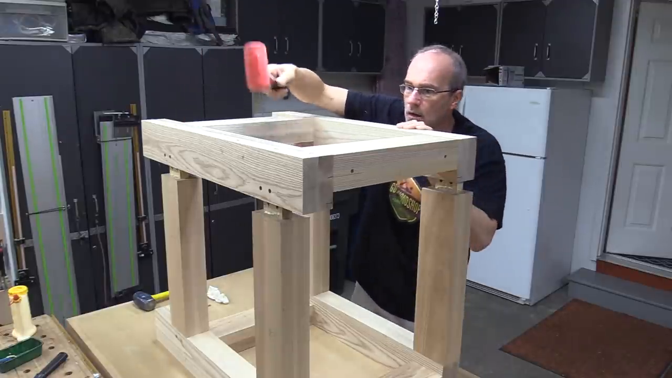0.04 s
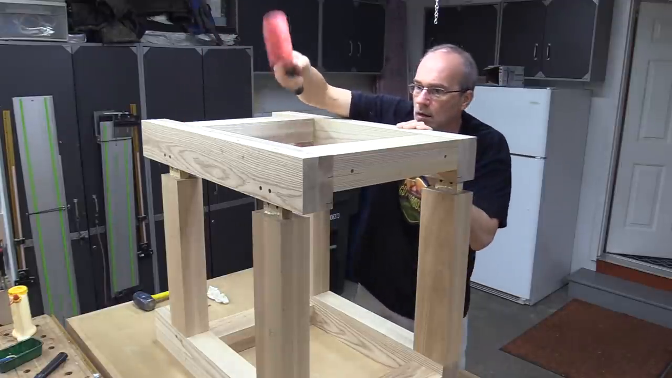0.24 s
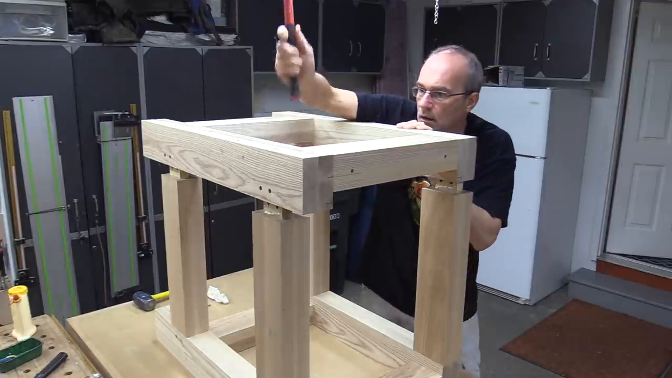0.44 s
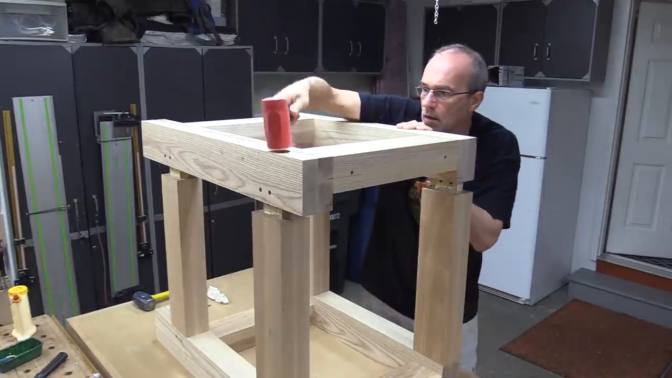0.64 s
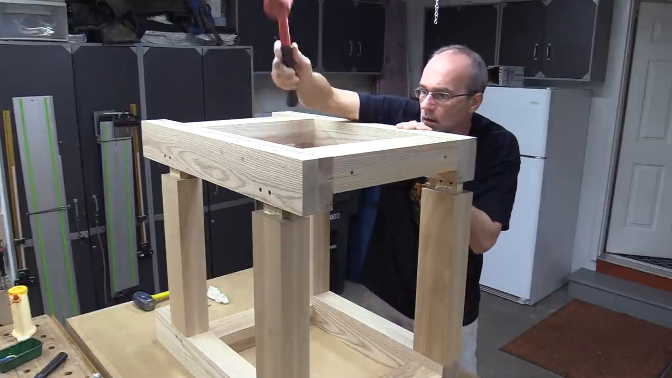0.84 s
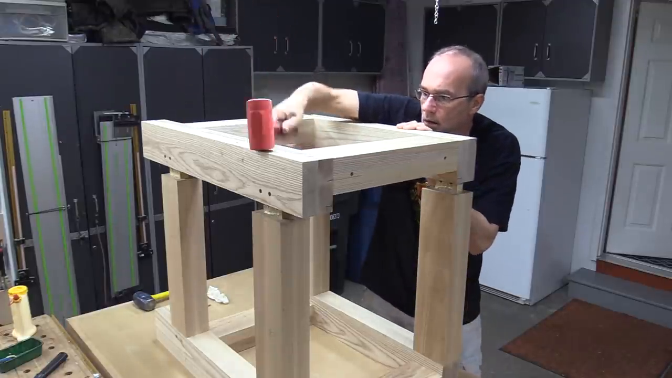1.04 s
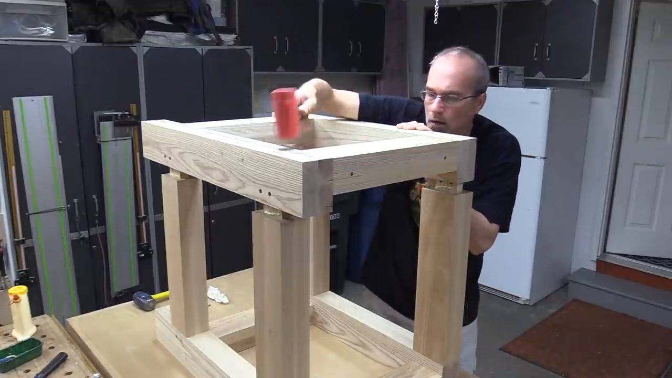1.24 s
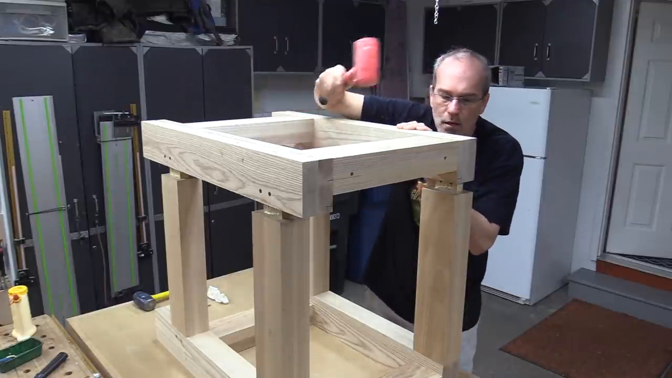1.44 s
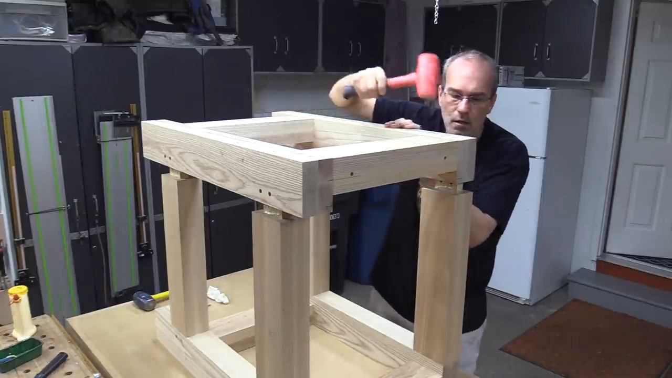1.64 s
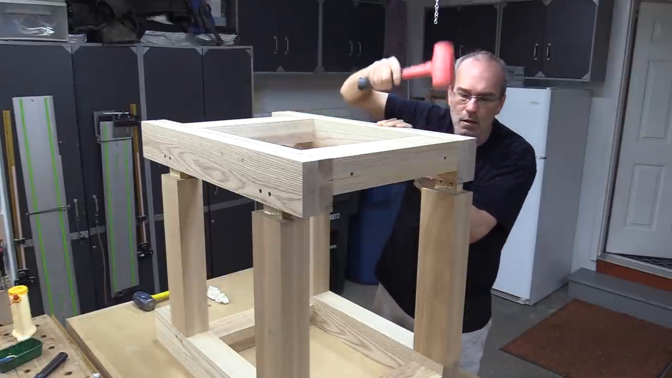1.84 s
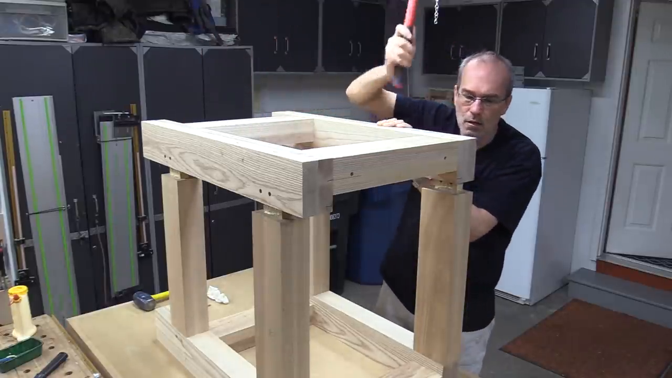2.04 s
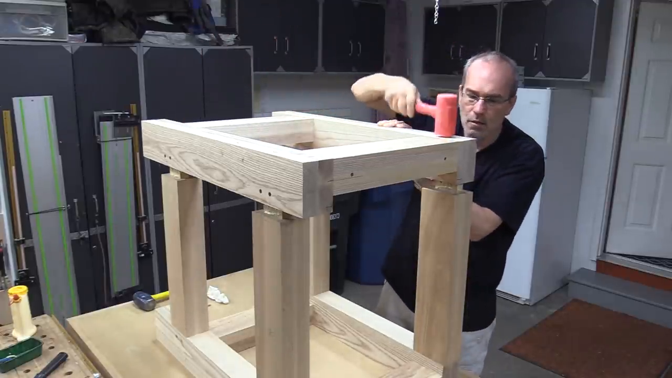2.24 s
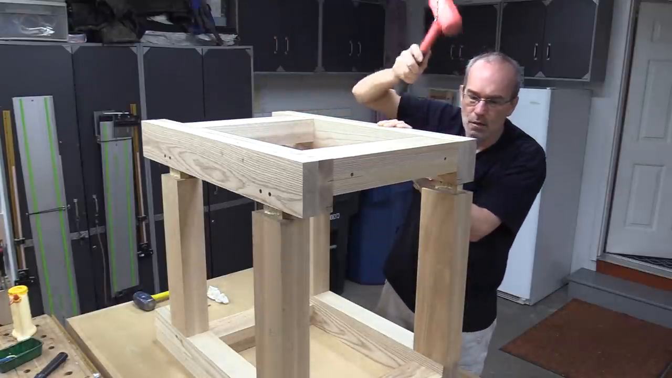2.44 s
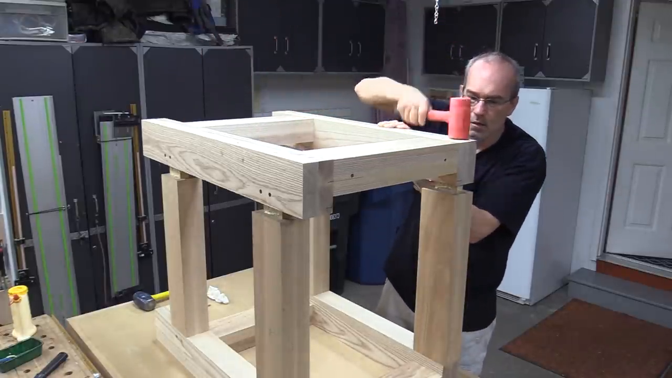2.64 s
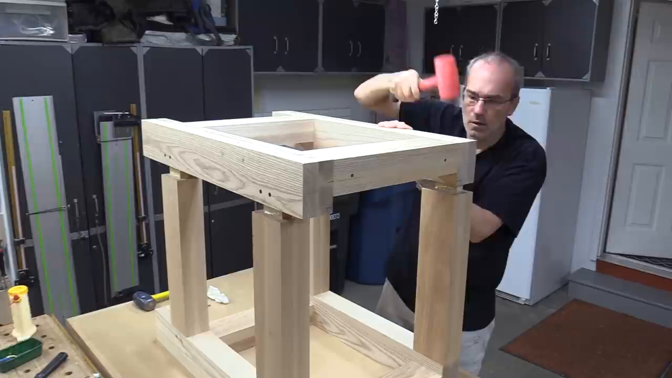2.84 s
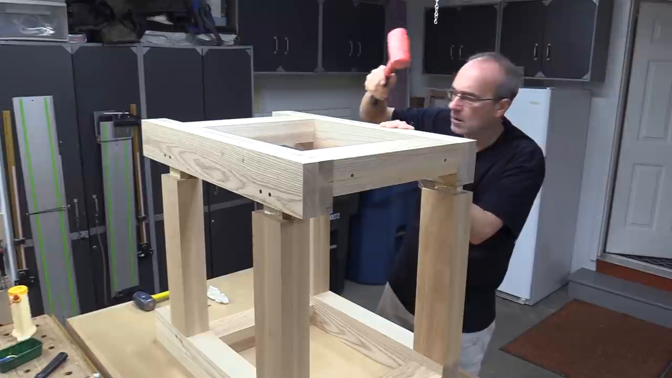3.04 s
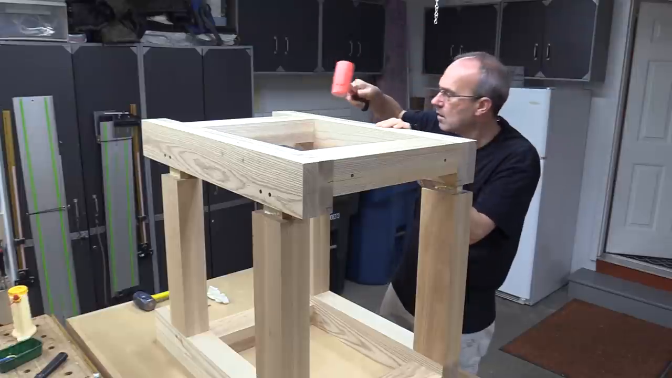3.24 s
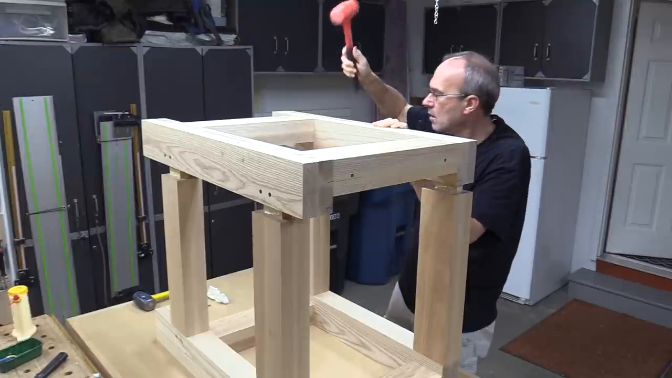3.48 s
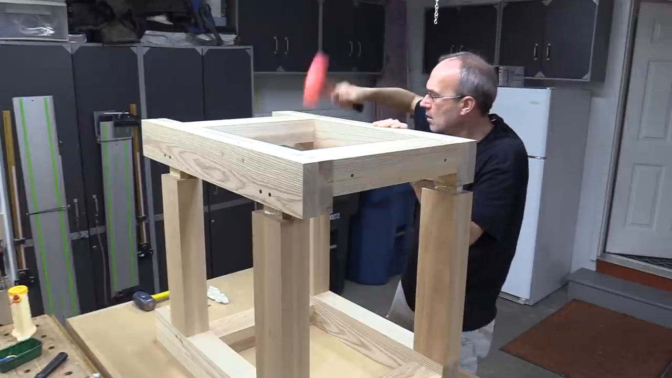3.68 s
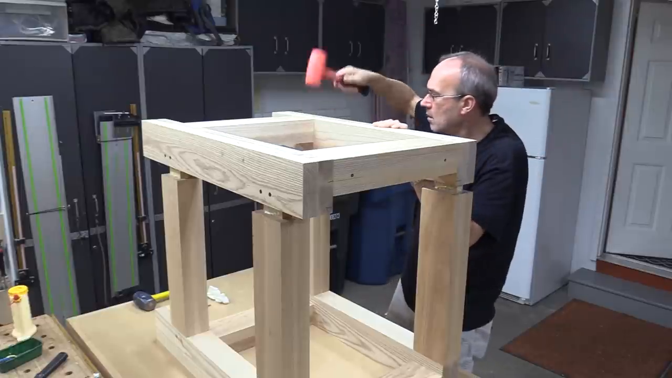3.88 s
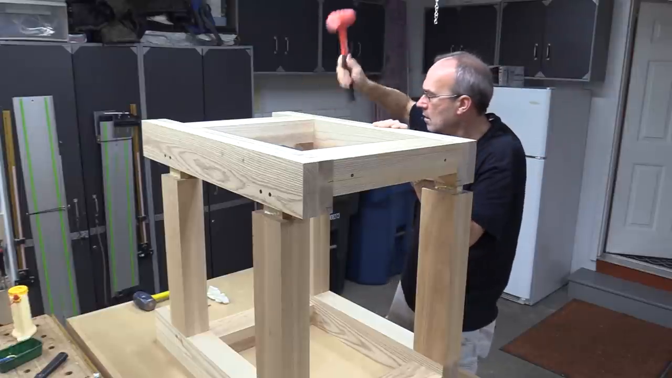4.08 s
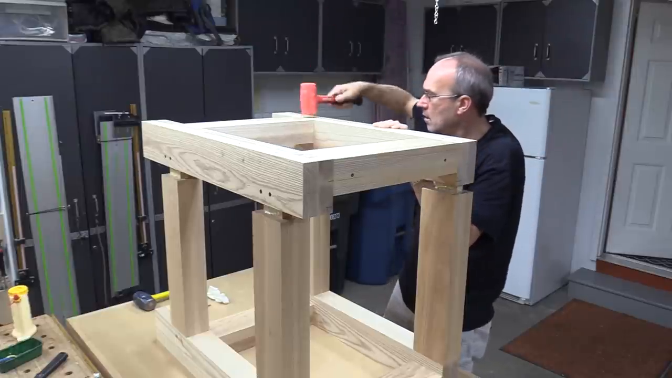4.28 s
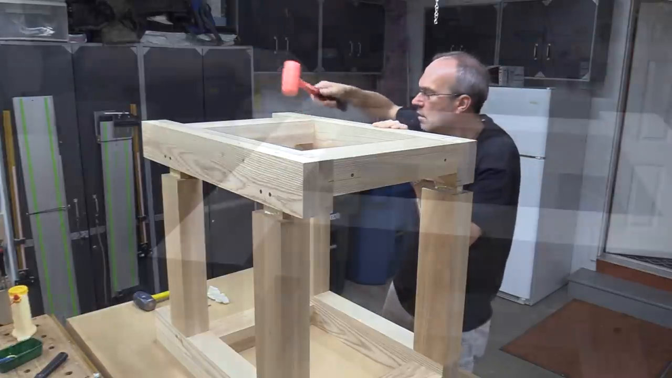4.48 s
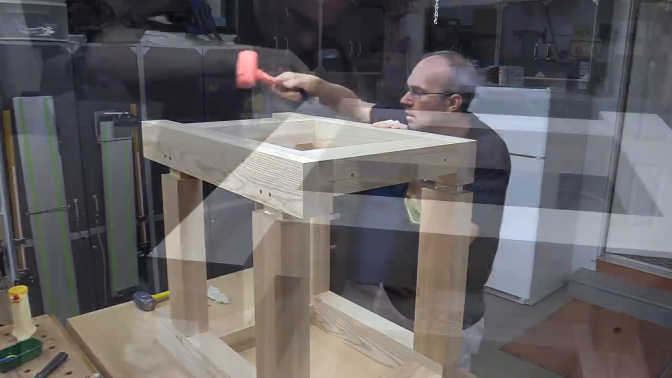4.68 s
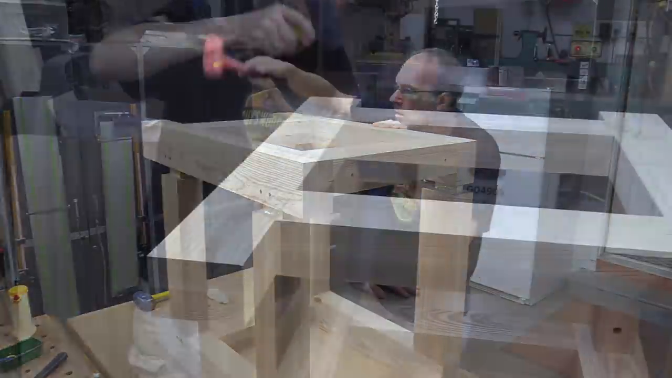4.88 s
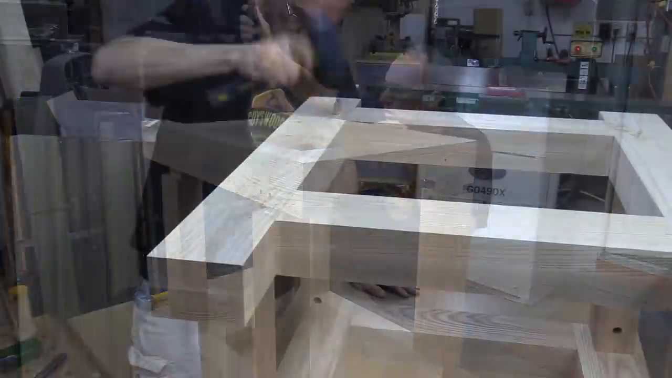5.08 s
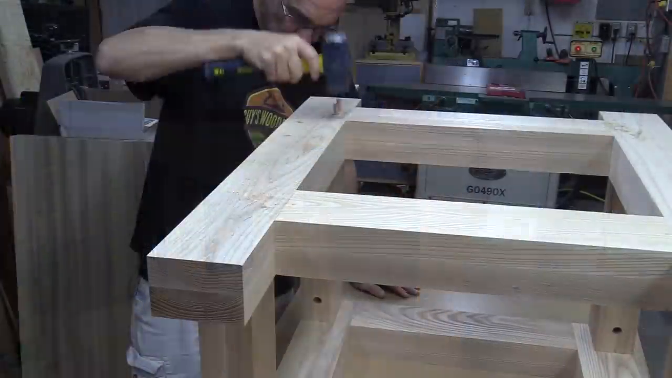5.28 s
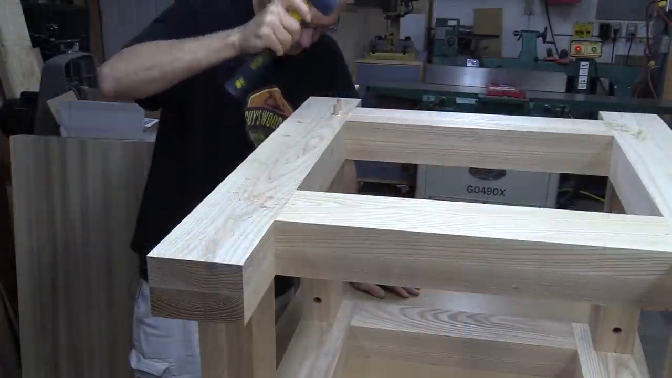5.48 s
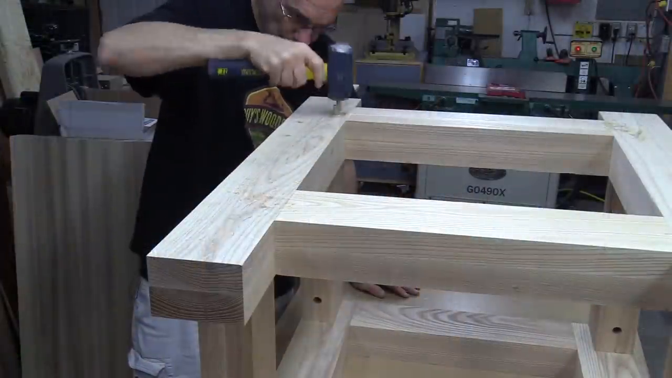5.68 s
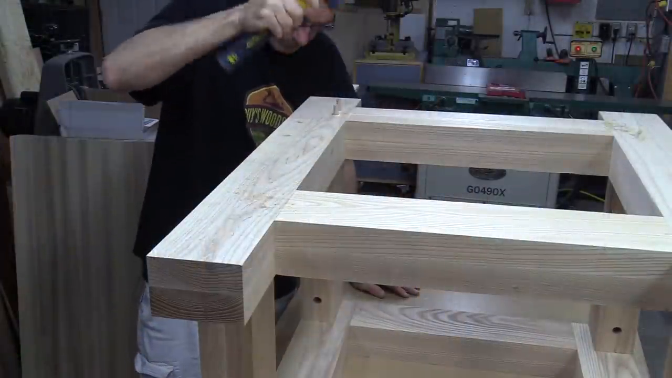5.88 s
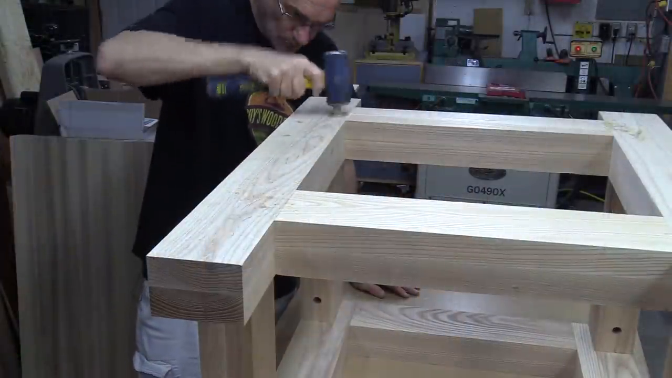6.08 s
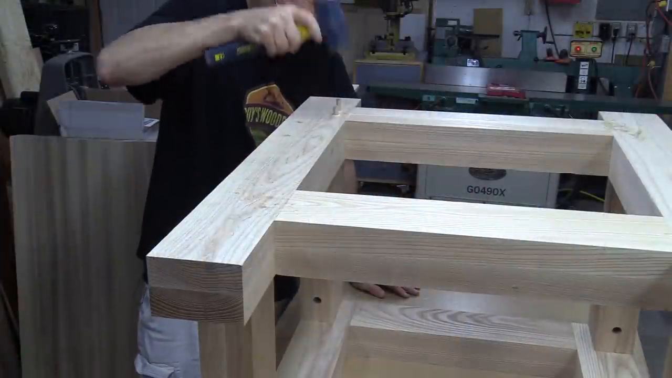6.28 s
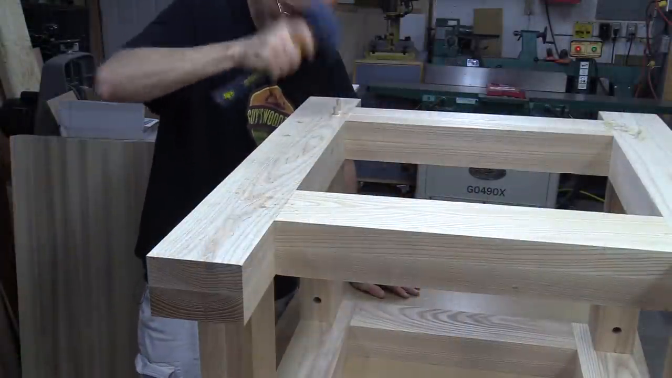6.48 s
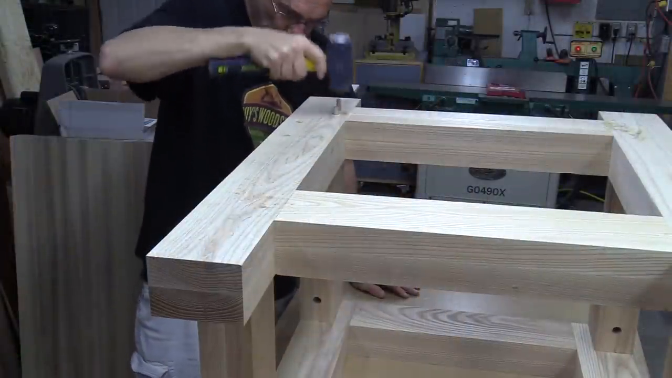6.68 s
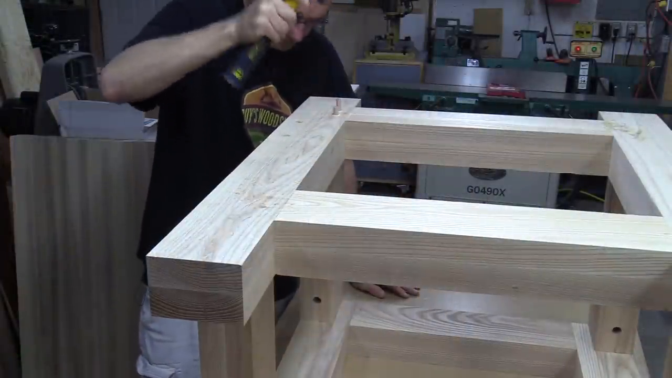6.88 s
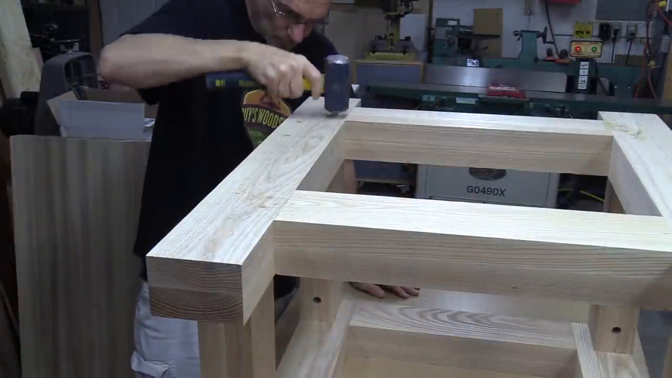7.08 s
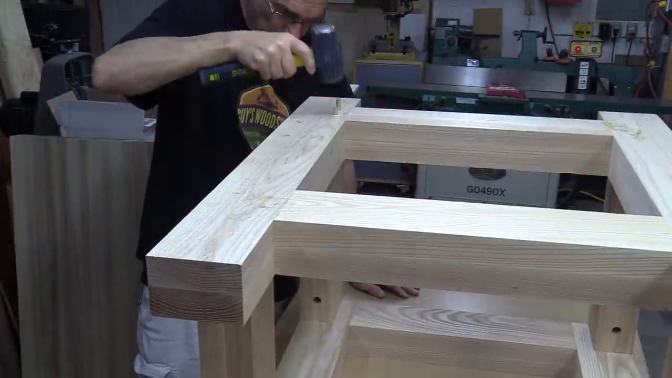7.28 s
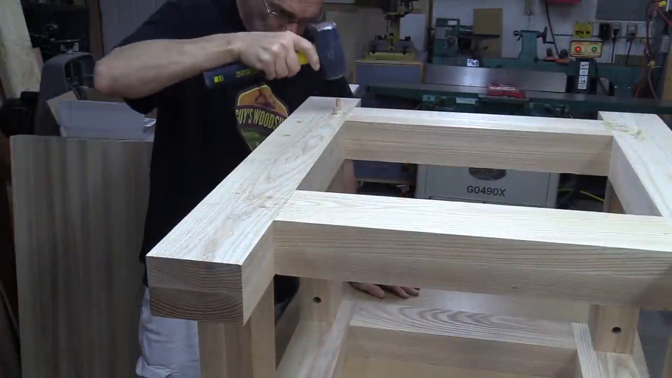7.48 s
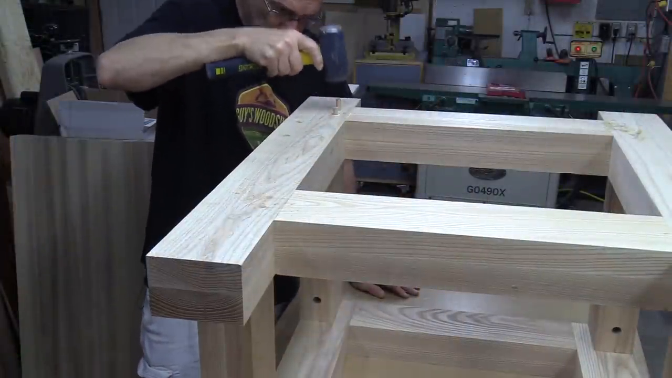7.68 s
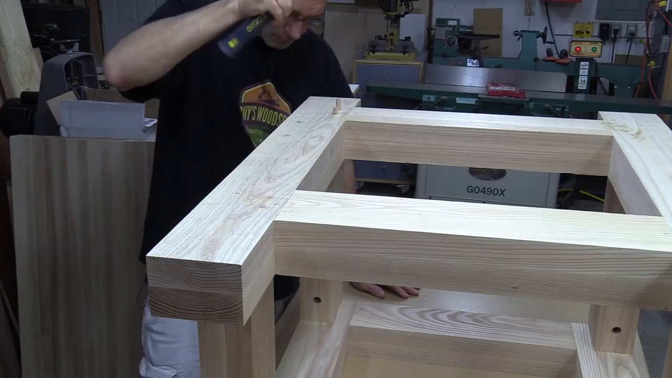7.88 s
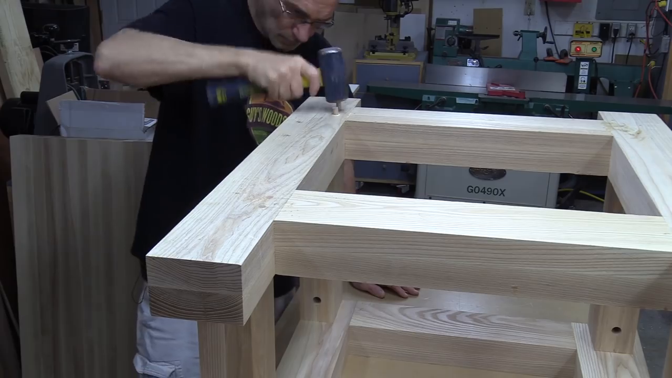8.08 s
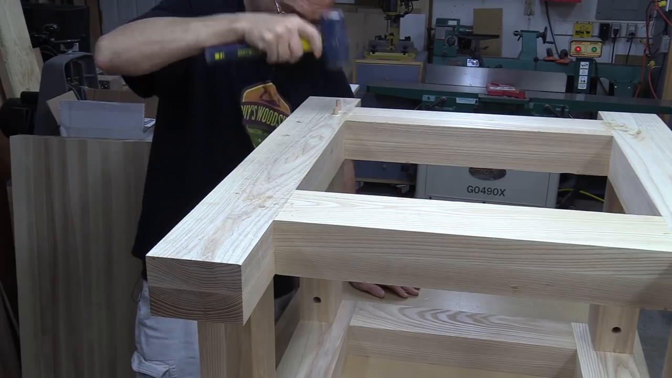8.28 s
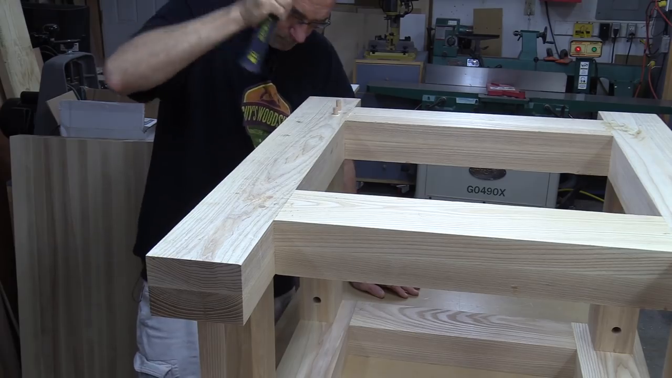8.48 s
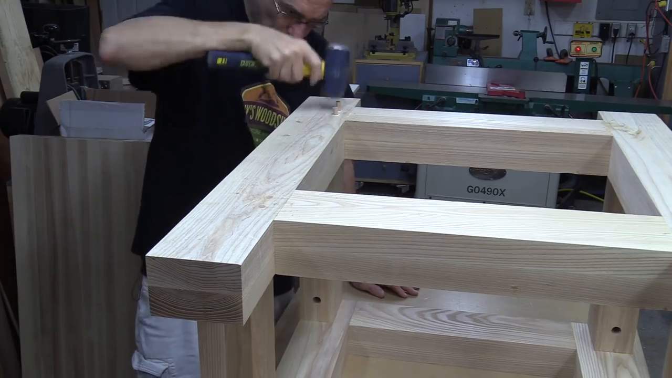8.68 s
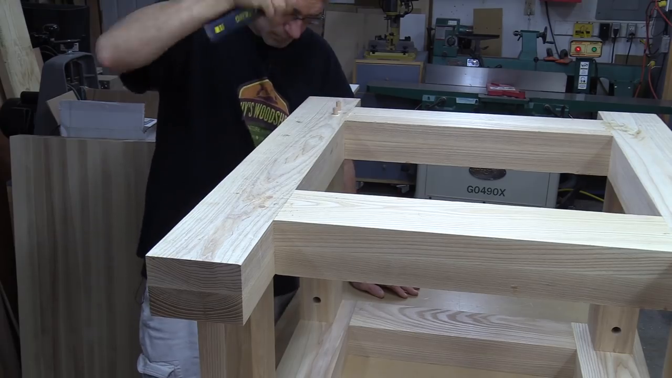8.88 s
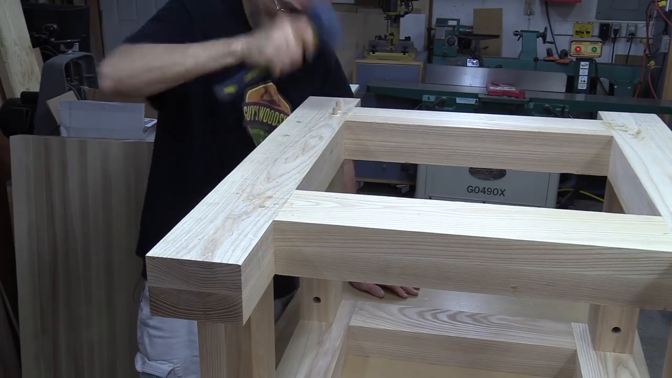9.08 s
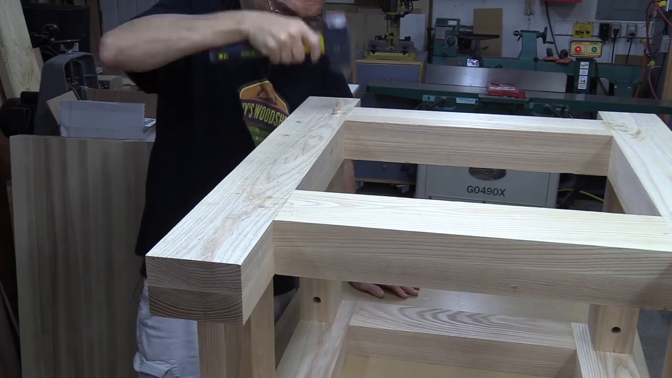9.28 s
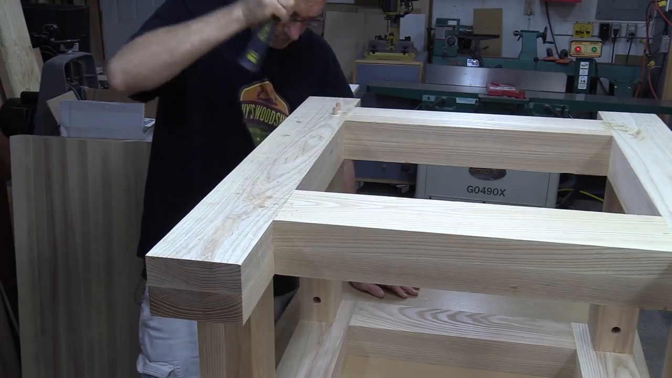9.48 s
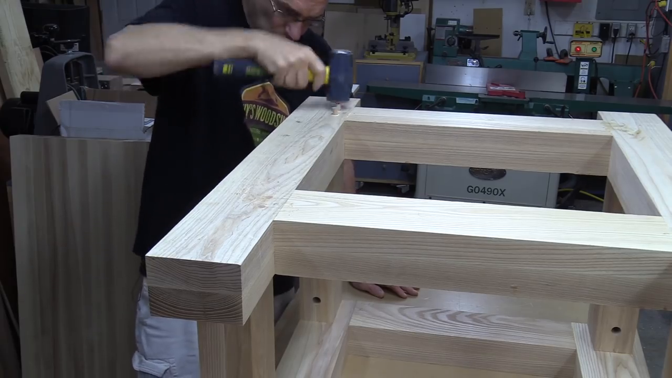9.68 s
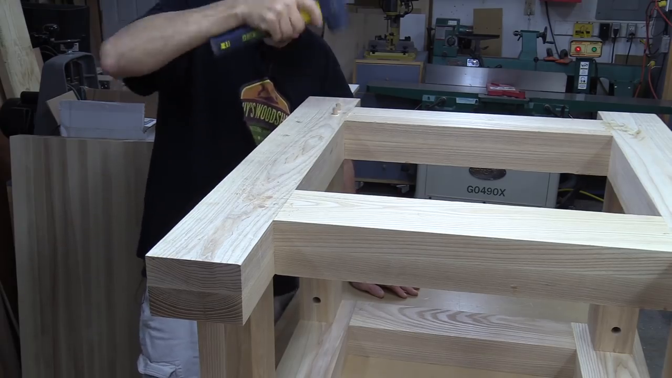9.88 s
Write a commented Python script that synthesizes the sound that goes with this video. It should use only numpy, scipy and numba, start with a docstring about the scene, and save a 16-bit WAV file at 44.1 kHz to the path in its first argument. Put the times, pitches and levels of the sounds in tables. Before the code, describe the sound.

The tail of a light mallet touch opens over quiet room air and low motor hum. A faint shot hiss at 0.5 s leads to a loud, sharp wooden crack at 0.66 and a duller knock at 1.1. A second pair, at a more resonant spot, lands at 2.3 and 2.7, the latter stronger, each preceded by a brief pellet swish. After a barely audible tap at 3.4, a harder-toned pair strikes at 3.8 and 4.25, again with small hisses. The background shifts to a closer position from 4.4 to 5.1. Fuller, thudding blows with bright clacks then hit a corner joint at 5.2, 5.7, 6.15, 6.6 and 7.1, growing more solid. After a pause, four more follow at 8.2, 8.7, 9.2 and 9.7, looser at first, the last firm and heavy. Hard-walled echoes hold briefly after each hit, then fade.

```python
"""Mallets on a pine frame in a workshop

A pine workbench frame is knocked together in a hard-walled shop: pairs of dead blows on the rail, with short
hisses of shot in the mallet, then, heard from closer by, a second mallet's blows on the corner. Each blow is a noise
crack, filtered wood and a push, with the room's echo; air noise and motor hum lie beneath. A limiter behind the
microphone ducks on loud blows and recovers, so that their echo stays level for a moment before it dies away.
"""
import sys
import numpy as np
from scipy import signal
from scipy.fft import rfft, irfft, next_fast_len
from scipy.io import wavfile
from scipy.ndimage import map_coordinates
from numba import njit

SR = 44100
rng = np.random.default_rng(int(sys.argv[2]) if len(sys.argv) > 2 else 0)


def output_pcm(signal):
    """Save a mono or channel-first signal as 16-bit PCM at the path in sys.argv[1].

    Samples are clipped to [-1, 1] before scaling.
    """
    pcm = np.clip(np.atleast_2d(signal).T, -1, 1) * 32767
    wavfile.write(sys.argv[1], SR, np.round(pcm).astype(np.int16))


N = 437913

# Mallet set down lightly on the rail; the first touch begins just before the start, so only its rest is heard.
# Each row: start in seconds, level in dB, resonance of the place in Hz.
LIGHT_TOUCHES = [(-.09, -19, 1400), (3.398, -52, 1140)]
# Shot sliding inside the dead-blow head as the swing turns over.
# Each row: centre in seconds, level in dB, standard deviation of the swell in seconds.
SHOT_SLIDES = [(.54, -50.5, 0.021), (2.131, -44, 0.021), (2.616, -42, 0.017), (3.657, -46, 0.018),
               (4.155, -42, 0.016)]
# Broad colour of a knock with the far and the near mallet. Each row: frequency in Hz, relative level in dB per Hz.
RAIL_COLOUR = [(30, -26.5), (80, -12), (150, -3.5), (240, -4), (400, -5.5), (600, -5), (900, -1),
               (1450, -7), (2000, -13.5), (3000, -19), (4000, -22), (6500, -20), (9000, -23.5),
               (12000, -34)]
CORNER_COLOUR = [(30, -12), (85, -11.5), (150, 0), (195, 4), (260, 6), (400, -1), (620, -3.5), (1100, -8.5),
                 (1750, -11), (2200, -18.5), (4200, -21), (5300, -27.5), (8000, -30), (12000, -37.5)]
# Modes of the frame, struck on its far rail and on its corner.
# Each row: frequency in Hz, full width at half height in Hz, height above the colour in dB.
RAIL_MODES = [(160, 30, 2), (470, 40, 4), (581, 16, 6), (615, 18, 4), (662, 22, 9), (765, 25, 4),
              (830, 25, 3), (990, 28, 8), (1115, 25, 4), (1225, 25, 3), (1350, 30, 6), (1560, 40, 3)]
CORNER_MODES = [(117, 12, 4), (164, 16, 7), (228, 14, 5), (339, 15, 10), (457, 15, 10.5), (665, 30, 5),
                (748, 16, 9), (915, 25, 4), (988, 14, 10), (1368, 36, 5), (1560, 40, 5), (1655, 35, 4),
                (2536, 22, 6), (3625, 32, 6), (4220, 50, 3), (5715, 60, 3)]
# Decay of the workshop. Each row: frequency in Hz, time to fall 60 dB in seconds.
ROOM_DECAY = [(60, 0.55), (170, 0.38), (350, 0.48), (700, 0.54), (1500, 0.56), (4000, 0.58), (8000, 0.48),
              (12000, 0.41)]
# Colour of the quiet shop. Each row: frequency in Hz, relative level in dB per Hz.
AIR_COLOUR = [(25, -9.5), (45, -0.5), (90, -5.5), (140, -1), (250, -7.5), (400, -4.5), (800, -17),
              (1200, -16.5), (2000, -25), (5000, -28.5), (11500, -32)]
# Places on the rail, each struck twice.
# Each row: resonance in Hz, weight (low end) in dB, hardness (high end) in dB.
RAIL_PLACES = [(484, -1, -9), (715, 2.5, -4), (566, 5.5, 1)]
# Dead-blow strokes, two to a place. Each row: start in seconds, force in dB, pitch of the contact in Hz, snap in dB.
RAIL_BLOWS = [(.6583, 3.5, 2440, 8.5), (1.1108, 1.5, 1000, -8), (2.2742, 1.5, 1400, -5.5),
              (2.7142, 4, 2050, -2.5), (3.7975, -1, 1400, -8), (4.26, 1, 1450, -7)]
# Strokes on the corner.
# Each row: start in seconds, force in dB, how far the joint is seated from 0 to 1, pitch of the clack in Hz.
CORNER_BLOWS = [(5.2097, -1.5, 0.04, 6300), (5.6742, 1, 0.54, 7950), (6.1396, 2.5, 0.76, 5440),
                (6.6215, 2, 0.77, 5200), (7.111, 4.5, 0.95, 5700), (8.1783, 0.5, 0, 4150),
                (8.7098, 0, 0.36, 4320), (9.2189, 1, 0.36, 4340), (9.7198, 4, 0.94, 4500)]
# Appliance motor, at the first and at the closer position. Each row: frequency in Hz, middle level in dB rms.
HUM_FAR = [(59.2, -53), (134.6, -65), (188.4, -66), (285.3, -63.5), (1130, -75)]
HUM_NEAR = [(59.2, -58.5), (231.5, -60.5), (904.4, -64)]
# Start and end, in seconds, of the background's fade from the first position to the closer one.
MOVE_CLOSER = (4.4, 5.1)

AIR_FAR_DB, AIR_NEAR_DB = -49.5, -51.5  # room noise at the two positions, rms
PLACE_DB, PLACE_WIDTH = 9.5, .2  # height and relative width of the resonance of a place
# a squarer hit is shorter: its peak moves up and grows
SOFT_CONTACT_HZ, CONTACT_DB_PER_OCTAVE, CONTACT_WIDTH = 840, 10.5, 0.95
# a joint that closes thuds more and snaps less: (dB when loose, dB when seated)
THUD_DB, CLACK_DB, HARDNESS_DB, SNAP_DB = (-6, 5.5), (1.5, 7.5), (1, -.5), (-.5, -3)
# the thud rises in pitch as the joint stiffens; relative widths
THUD_HZ, THUD_WIDTH, CLACK_WIDTH = (370, 410), 1, 0.25
TOP_HZ = 11950  # upper band limit


def amp(db):
    """Decibels to gain."""
    return 10 ** (np.asarray(db) / 20)


def unit(x):
    """Scale to rms 1."""
    return x / np.sqrt(np.mean(x ** 2) + 1e-20)


def along(points, hz):
    """(Hz, value) points read on a log axis."""
    f, v = np.transpose(points)
    return np.interp(np.log(hz + 1), np.log(f + 1), v)


def bump(hz, centre, width):
    """Resonance curve of height 1; width is taken at half height."""
    return 1 / (1 + (2 * (hz - centre) / width) ** 2)


def shelf(hz, corner):
    """Rises smoothly from 0 below the corner frequency to 1 above it."""
    return hz ** 5 / (hz ** 5 + corner ** 5)


def filtered(x, response):
    """x times a response of frequency."""
    m = next_fast_len(N + 8192)
    return irfft(rfft(x, m) * response(np.fft.rfftfreq(m, 1 / SR)), m)[:N]


def noise(spectrum):
    """Coloured noise of rms 1."""
    return unit(filtered(rng.standard_normal(N), lambda hz: amp(along(spectrum, hz))))


def add(track, s, sound):
    """Mix a sound in from time s on; what lies before the start is cut."""
    start = round(s * SR)
    part = sound[max(-start, 0):N - start]
    track[max(start, 0):][:len(part)] += part


def ring(level_db):
    """Causal (minimum-phase) impulse response, of energy 1, shaped by levels on a 1 Hz grid."""
    cepstrum = irfft(level_db * np.log(10) / 20)
    cepstrum[1:SR // 2] *= 2
    cepstrum[SR // 2:] = 0
    response = irfft(np.exp(rfft(cepstrum)))[:SR // 2]
    return response / np.linalg.norm(response)


def room_tail():
    """One second of diffuse echo, starting near rms 1; each frequency dies at its own speed."""
    hz, t, z = signal.stft(rng.standard_normal(SR), SR, nperseg=512)
    decay = amp(-60 * t / along(ROOM_DECAY, hz)[:, None])
    return signal.istft(z * decay, SR, nperseg=512)[1][:SR]


def timber(colour, modes):
    """Level of the frame's response on a 1 Hz grid: a broad colour with modes standing out of it."""
    hz = np.fft.rfftfreq(SR, 1 / SR)
    return along(colour, hz) + sum(db * bump(hz, centre, width) for centre, width, db in modes)


def touches(wood_db):
    """A light touch excites the rail and the resonance of its place, giving a small, dull knock."""
    track, t, hz = np.zeros(N), np.arange(SR) / SR, np.fft.rfftfreq(SR, 1 / SR)
    for s, db, place_hz in LIGHT_TOUCHES:
        direct = amp(14.0 - 60 * t / 0.12) * rng.standard_normal(SR)
        echo = amp(-4) * room_tail()
        place = PLACE_DB * bump(hz, place_hz, PLACE_WIDTH * place_hz)
        add(track, s, amp(db) * signal.fftconvolve(direct + echo, ring(wood_db + place)))
    return track


def hum(lines, waver_db, rate):
    """Motor tones, each wavering at random in level; rate is in new random levels a second."""
    t = np.arange(N) / SR

    def waver():
        return map_coordinates(rng.standard_normal(400), [t * rate], mode="wrap")

    return sum(amp(db + waver_db * waver()) * np.sqrt(2) * np.sin(2 * np.pi * hz * t) for hz, db in lines)


def background():
    """Soft room noise and motor hum, fading from the first position to the closer one."""
    near = np.interp(np.arange(N) / SR, MOVE_CLOSER, (0, 1))
    air = amp(AIR_FAR_DB + near * (AIR_NEAR_DB - AIR_FAR_DB)) * noise(AIR_COLOUR)
    far_hum = (1 - near) * hum(HUM_FAR, waver_db=-0.5, rate=7)
    near_hum = near * hum(HUM_NEAR, waver_db=1.5, rate=8.9)
    return air + far_hum + near_hum


def loose_shot():
    """Pellets sliding along the hollow mallet head: coloured noise swells in short hisses, with a faint echo."""
    t = np.arange(N) / SR
    flow = sum(amp(db) * np.exp(-.5 * ((t - s) / length) ** 2) for s, db, length in SHOT_SLIDES)
    hiss = flow * noise([(800, -17.0), (2000, -14.0), (2800, -0.5), (3600, -10.5),
                         (4900, 1.0), (6200, -10.5), (8000, -17.5), (12000, -13.5)])
    return hiss + amp(-47.5) * signal.fftconvolve(hiss, room_tail())[:N]


def knock(colour_db, usual_echo, direct_db, direct_t60, build_time, crack_db, crack_t60, push_db, push_time, alike):
    """One blow cracks on the surface and rings the frame, heard directly and through the room; times in s."""
    t, hz = np.arange(SR) / SR, np.fft.rfftfreq(SR, 1 / SR)
    surface = ring(along([(300, -14.5), (1500, 11), (2500, 2), (4000, 14), (8000, -11), (12000, -12.5)], hz))
    # the crack arrives first; slower bending waves then scatter through the joints
    burst = amp(crack_db - 60 * t / crack_t60) * rng.standard_normal(SR)
    crack = signal.fftconvolve(burst, surface)[:SR]
    build = 1 - np.exp(-t / build_time)
    direct = amp(direct_db - 60 * t / direct_t60) * build * rng.standard_normal(SR)
    # the mallet lands near the same spot, so the echoes are partly alike
    mixed_echo = np.sqrt(alike) * usual_echo + np.sqrt(1 - alike) * room_tail()
    echo = mixed_echo * (1 - np.exp(-t / .012))
    wood = signal.fftconvolve(direct + echo, ring(colour_db))[:SR]
    # the whole frame is shoved once against the bench
    u = t / push_time
    push = amp(push_db) * u * (2 - u) * np.exp(-u)
    return crack + wood + push


def rail_blows(wood_db, level_db, weight_hz, hard_hz, snap_hz):
    """Pairs of dead blows: place sets resonance, weight and hardness; squareness of the hit, contact pitch."""
    track, hz, echo = np.zeros(N), np.fft.rfftfreq(SR, 1 / SR), room_tail()
    for i, (s, force_db, contact_hz, snap_db) in enumerate(RAIL_BLOWS):
        place_hz, weight_db, hard_db = RAIL_PLACES[i // 2]
        place = PLACE_DB * bump(hz, place_hz, PLACE_WIDTH * place_hz)
        place += weight_db * (1 - shelf(hz, weight_hz)) + hard_db * shelf(hz, hard_hz)
        peak_db = CONTACT_DB_PER_OCTAVE * np.log2(contact_hz / SOFT_CONTACT_HZ)
        contact = peak_db * bump(hz, contact_hz, CONTACT_WIDTH * contact_hz) + snap_db * shelf(hz, snap_hz)
        sound = knock(wood_db + place + contact, echo, direct_db=14.5, direct_t60=0.082, build_time=0.0048,
                      crack_db=-16.0, crack_t60=0.012, push_db=-3.5, push_time=0.0022, alike=0.33)
        add(track, s, amp(level_db + force_db) * sound)
    return track


def corner_blows(wood_db, level_db, hard_hz, snap_hz):
    """Two runs of blows drive joints home; the colour of each follows how far the joint is seated."""
    track, hz, echo = np.zeros(N), np.fft.rfftfreq(SR, 1 / SR), room_tail()
    for s, force_db, seated, clack_hz in CORNER_BLOWS:
        thud_hz, thud_db, clack_db, hard_db, snap_db = (
            loose + seated * (tight - loose)
            for loose, tight in (THUD_HZ, THUD_DB, CLACK_DB, HARDNESS_DB, SNAP_DB))
        thud = thud_db * bump(hz, thud_hz, THUD_WIDTH * thud_hz)
        clack = clack_db * bump(hz, clack_hz, CLACK_WIDTH * clack_hz)
        contact = hard_db * shelf(hz, hard_hz) + snap_db * shelf(hz, snap_hz)
        sound = knock(wood_db + thud + clack + contact, echo, direct_db=17.5, direct_t60=0.053, build_time=0.014,
                      crack_db=-6, crack_t60=0.013, push_db=-7.5, push_time=0.0086, alike=0.63)
        add(track, s, amp(level_db + force_db) * sound)
    return track


@njit
def follow(excess, attack, slew, release):
    """Gain reduction in dB: closes on any excess, at most slew a sample, and lets go at a steady rate."""
    cut, now = np.zeros(len(excess)), 0.
    for i in range(len(excess)):
        if excess[i] > now:
            now += min(attack * (excess[i] - now), slew)
        else:
            now = max(now - release, 0.)
        cut[i] = now
    return cut


def limiter(x, threshold_db, attack_time, closing_rate, release_rate):
    """Turns down whatever passes the threshold; attack in seconds, both rates in dB a second."""
    excess = 20 * np.log10(np.abs(x) + 1e-9) - threshold_db
    return x * amp(-follow(excess, 1 / (attack_time * SR), closing_rate / SR, release_rate / SR))


def saturate(x, top_db):
    """Rounded clipping at a ceiling."""
    return x / (1 + np.abs(x / amp(top_db)) ** 6) ** (1 / 6)


def scene():
    """Both mallets at work over the quiet of the shop."""
    rail = timber(RAIL_COLOUR, RAIL_MODES)
    corner = timber(CORNER_COLOUR, CORNER_MODES)
    pairs = rail_blows(rail, level_db=6, weight_hz=383, hard_hz=1600, snap_hz=6500)
    run = corner_blows(corner, level_db=7, hard_hz=1290, snap_hz=5960)
    return (touches(rail) + background() + loose_shot() + pairs + run)[None]


def record(dry):
    """The limiter is too slow for the first milliseconds of a blow, which clip; then a soft top and band limit."""
    held = limiter(dry[0], threshold_db=-6.0, attack_time=0.00037, closing_rate=4800, release_rate=460)
    clipped = saturate(held, top_db=-.2)
    soft = signal.lfilter([.8, .2], 1, clipped)
    return filtered(soft, lambda hz: 1 / np.sqrt(1 + (hz / TOP_HZ) ** 160))[None]


dry = scene()
out = record(dry)
output_pcm(out)
```